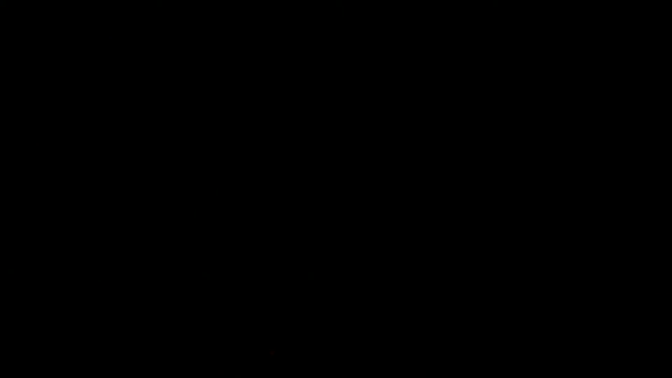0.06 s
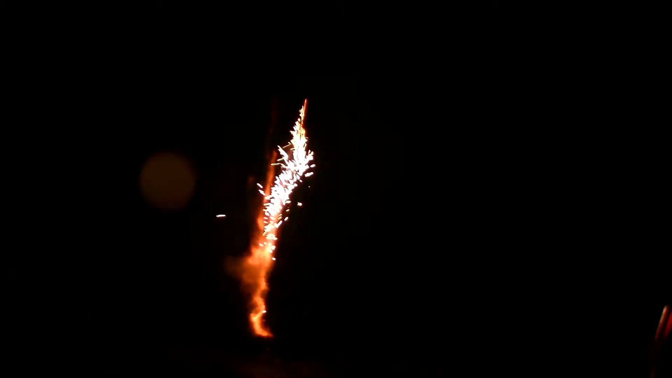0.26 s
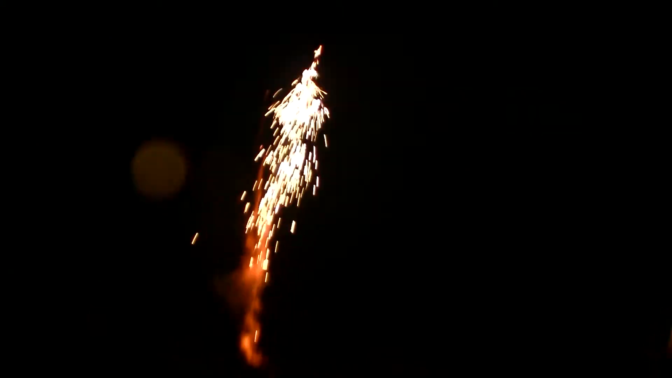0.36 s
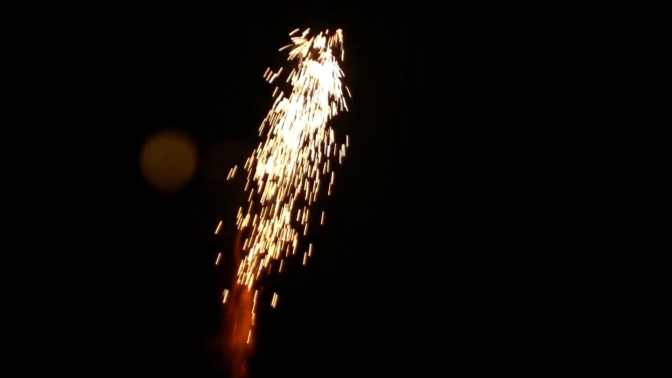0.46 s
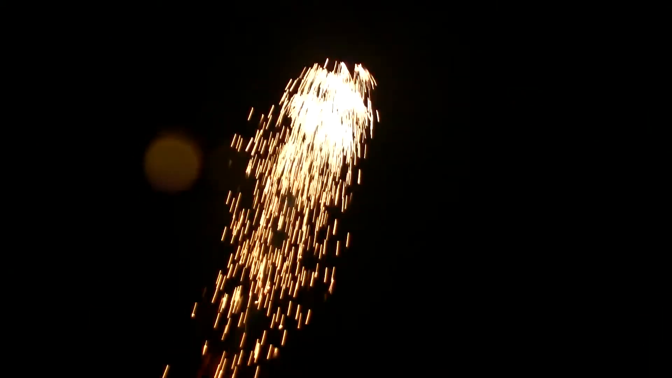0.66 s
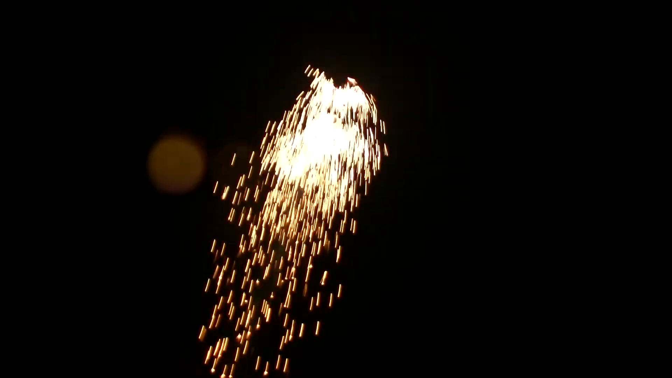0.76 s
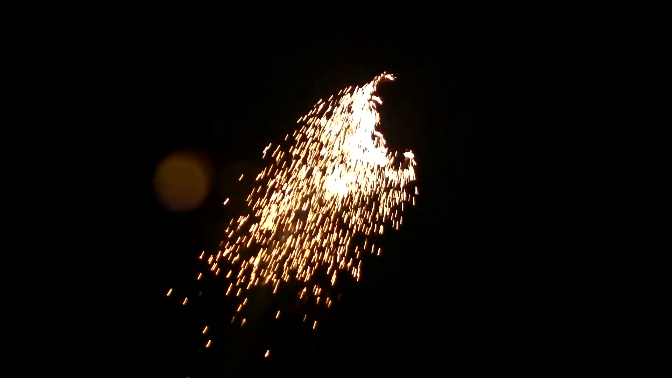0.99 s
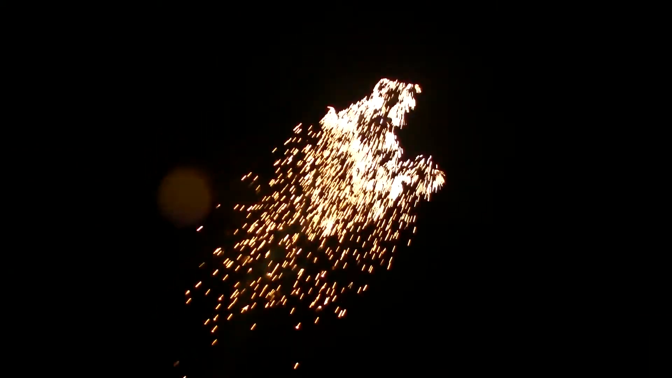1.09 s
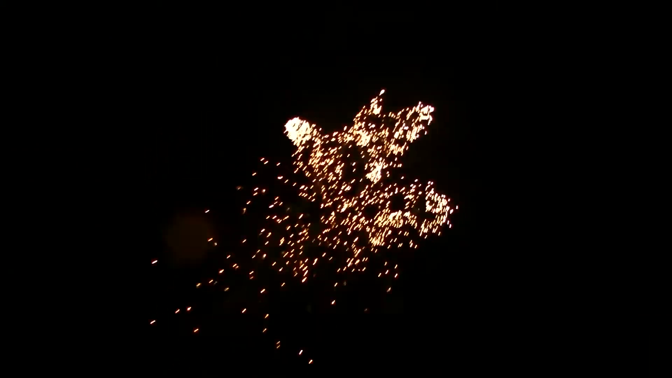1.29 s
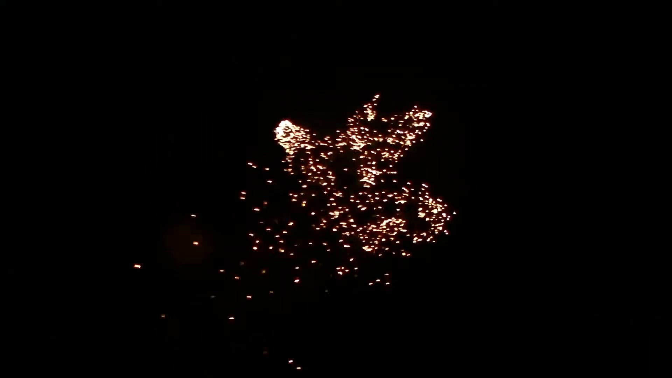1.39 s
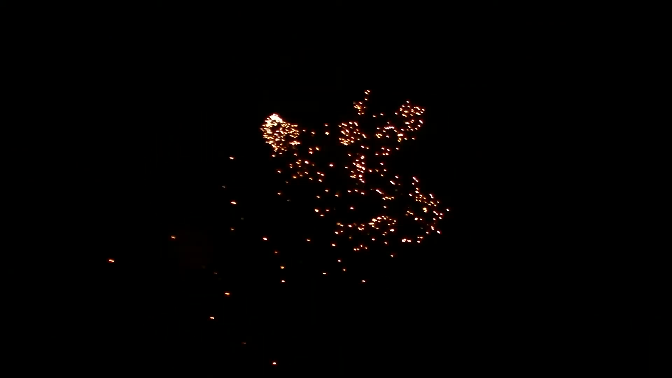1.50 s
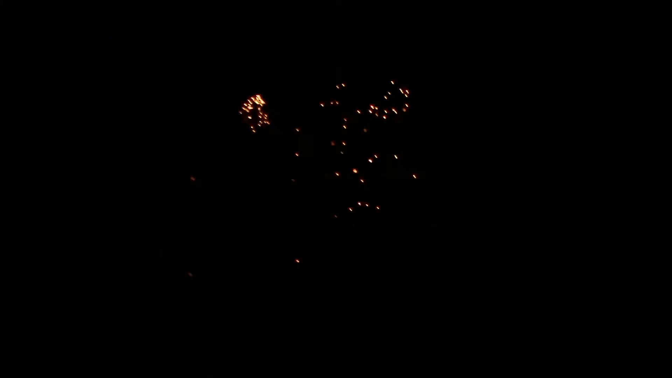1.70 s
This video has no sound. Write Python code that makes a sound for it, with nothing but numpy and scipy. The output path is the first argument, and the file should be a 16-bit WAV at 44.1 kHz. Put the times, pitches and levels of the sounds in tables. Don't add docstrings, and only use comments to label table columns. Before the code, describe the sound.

A whistling firework pops from its tube and screams raspily, falling in pitch, outdoors at night

```python
import sys
import numpy as np
from scipy import signal
from scipy.fft import rfft, irfft, next_fast_len
from scipy.io import wavfile
from scipy.ndimage import uniform_filter1d, map_coordinates

SR = 44100
rng = np.random.default_rng(int(sys.argv[2]) if len(sys.argv) > 2 else 0)


def file_out(sig):
    cols = np.atleast_2d(sig).T
    lim = np.clip(cols, -1, 1)
    pcm = np.round(lim * 32767).astype(np.int16)
    wavfile.write(sys.argv[1], SR, pcm)


def attenuation_scalar(level_db):
    decades = np.asarray(level_db, float) / 20
    return 10 ** decades


N = 74970

# [f/Hz, level/dB]
NIGHT_SPECTRUM = [(15, -40), (25, -15.5), (246, -6.5), (378, -8), (445, -8), (804, -16), (945, -15.5),
                  (1240, -15.5), (15500, -39)]
# [f/Hz, t60/s]
FIELD_DECAY = [(100, 0.23), (1000, 1), (3000, 1), (10000, 0.4)]
# [f/Hz, level/dB, t60/s]
TUBE_MODES = [(96, -15, 0.11), (262, -1, 0.042), (423, -7, 0.057), (998, -11, 0.022), (1186, -15.5, 0.048)]
# [t/s, level/dB, t60/s]
FLAME_PUFFS = [
    (.195, -29, 0.14),
    (0.2048, -5, 0.059),
    (.2125, -15, 0.047),
]
# [f/Hz, level/dB]
FLAME_SPECTRUM = [(100, 6), (400, -1.5), (1500, -7), (4000, -7.5), (8000, -16.5), (15000, -42)]
# [t/s, pitch f/Hz, tone level/dB, sputter level/dB, alternation/0-1, chaos/0-1]
STAR_FLIGHT = [(.246, 3896, -35, -60, 0, 0.45), (.262, 3815, -18, -35, 0, 0.4),
               (.272, 3655, -18, -14.5, 0, 0.67), (.31, 3443, -20.5, -20, 0.1, 1.06),
               (.345, 3395, -16, -18, 0, 0.84), (.41, 3251, -22.5, -13.5, 0.3, 0.88),
               (.5, 2960, -33, -16, 0, 0.86), (.56, 2830, -19.5, -17, 0, 0.98),
               (.66, 2747, -29.5, -17.5, 0, 0.91), (.8, 2626, -20, -14.5, 0.07, 0.88),
               (.92, 2400, -27, -14.5, 0.11, 0.91), (1.05, 2258, -19, -16, 0.3, 0.79),
               (1.15, 2191, -24.5, -19, 0.42, 0.68), (1.25, 2194, -24, -22.5, 0.37, 0.61),
               (1.33, 2250, -21, -21, 0.33, 0.55), (1.385, 2422, -30.5, -28.5, 0.43, 0.72),
               (1.435, 2702, -34, -33.5, 0.4, 0.65), (1.455, 2820, -73, -48, 0.06, .6)]
# [t/s, gain level/dB, half width/s]
STAR_FLARES = [(.285, 2, .015), (.39, 2.5, 0.025), (0.537, 4.5, 0.012), (0.646, 5.5, 0.0091),
               (.72, 2, 0.013), (.84, 0.5, 0.014), (.9, 1, 0.016), (.99, 1, 0.013), (1.12, 0, .012),
               (1.214, 5.5, 0.0092), (1.305, 0, .012)]
# [t/s, pitch f/Hz, tone level/dB, sputter level/dB, alternation/0-1, chaos/0-1]
FRAGMENT_FLIGHT = [
    (.88, 2151, -27, -31, 0.19, 0.72),
    (.98, 1996, -29, -26.5, 0.1, 0.74),
    (1.21, 2063, -16.5, -28, 0.8, 0.54),
    (1.33, 2008, -31, -26.5, 0.27, 0.54),
    (1.41, 1927, -36.5, -32.5, 0.62, 0),
    (1.49, 1989, -32, -33.5, .6, 0.08),
    (1.58, 2235, -39.5, -35, 0.17, 0.01),
    (1.635, 2405, -33.5, -45.5, 0.14, 0.13),
    (1.675, 2780, -46, -53, 0, 0.14),
]
# [f/Hz, level/dB]
PULSE_SPECTRUM = [(60, -51.5), (200, -10), (500, -3), (1500, -4), (3000, 0.5), (6000, -6), (10000, -22),
                  (15000, -38.5)]
# [f/Hz, level/dB]
DISTANCE_LOSS = [(2500, 2), (6000, -6), (15000, -20)]


def unit(x):
    return x / np.sqrt(np.mean(x ** 2) + 1e-20)


def along(points, hz):
    f, value = np.transpose(points)
    return np.interp(np.log(hz + 1), np.log(f + 1), value)


def wobble(rate):
    return map_coordinates(rng.standard_normal(1000), [np.arange(N) * rate / SR])


def coloured(x, spectrum):
    size = next_fast_len(N + SR // 4)
    gain = attenuation_scalar(along(spectrum, np.fft.rfftfreq(size, 1 / SR)))
    cepstrum = irfft(np.log(gain), size)
    cepstrum[1:size // 2] *= 2
    cepstrum[size // 2 + 1:] = 0
    response = np.exp(rfft(cepstrum))
    return irfft(rfft(x, size) * response, size)[:N]


def impulses(at, size):
    k = np.floor(at)[:, None] + np.arange(-7, 9)
    offset = k - at[:, None]
    shape = np.sinc(offset) * np.cos(np.pi * offset / 16) ** 2
    place = np.clip(k, 0, N - 1).astype(int)
    return np.bincount(place.ravel(), (shape * size[:, None]).ravel(), N)


def earlier_echoes():
    t = np.arange(N) / SR
    wash_db = -39.5 - 11 * t + 1.4 * wobble(33)
    wash = unit(coloured(rng.standard_normal(N), NIGHT_SPECTRUM)) * attenuation_scalar(wash_db)
    boom = attenuation_scalar(-34.5 - 60 * t / 0.23) * np.sin(2 * np.pi * 97 * t)
    return wash + boom


def field_echoes(x):
    delay_s = .025
    hz, t, z = signal.stft(rng.standard_normal(SR), SR, nperseg=256)
    decay = attenuation_scalar(-60 * t / along(FIELD_DECAY, hz)[:, None])
    tail = signal.istft(z * decay, SR, nperseg=256)[1]
    late = np.pad(x, (int(delay_s * SR), 0))
    return signal.fftconvolve(late, tail / np.linalg.norm(tail))[:N]


def muzzle_flame():
    t = np.arange(N) / SR
    level = 0
    for start, db, t60 in FLAME_PUFFS:
        level = level + (t > start) * attenuation_scalar(db - 60 * np.maximum(t - start, 0) / t60)
    return level * unit(coloured(rng.standard_normal(N), FLAME_SPECTRUM))


def lift_charge():
    pop_s, blast_s, crack_t60 = .2102, 0.00067, 0.0069
    t = np.arange(N) / SR
    u = np.maximum(t - pop_s, 0)
    kick = -attenuation_scalar(-6) * (1 - u / blast_s) * np.exp(-u / blast_s)
    ring = sum(attenuation_scalar(db - 60 * u / t60) * np.sin(2 * np.pi * hz * u) for hz, db, t60 in TUBE_MODES)
    crack = attenuation_scalar(-3.5 - 60 * u / crack_t60) * rng.standard_normal(N)
    return (t > pop_s) * (kick + ring + crack)


def whistler(flight, tone_swing_db, sputter_swing_db):
    waver, flutter_swing_db, jitter, scatter_db = .045, 2.5, 0.44, 4
    leave_s, far_s = 0.39, 1.42
    t = np.arange(N) / SR
    s, *columns = np.transpose(flight)
    hz, tone_db, sputter_db, alternation, chaos = [np.interp(t, s, c) for c in columns]
    alternation, chaos = np.clip(alternation, 0, 1), np.clip(chaos, 0, 1)
    burning = (t > s[0]) & (t < s[-1])

    cycles = np.cumsum(hz * (1 + waver * chaos * wobble(120))) / SR
    flutter_db = flutter_swing_db * chaos * wobble(140)
    tone = np.sqrt(2) * np.cos(2 * np.pi * cycles) * attenuation_scalar(tone_db + tone_swing_db + flutter_db)

    k = np.arange(1, int(cycles[-1]))
    luck = rng.standard_normal((N // 8, 2))[:len(k)]
    at = np.interp(k, cycles, np.arange(N))
    i = at.astype(int)
    strong_weak = 1 + alternation[i] * (-1.) ** k
    size = attenuation_scalar(scatter_db * chaos[i] * luck[:, 0]) * strong_weak
    shift = jitter * chaos[i] * luck[:, 1] * SR / hz[i]
    near = coloured(impulses(at + shift, size), PULSE_SPECTRUM)
    far = coloured(near, DISTANCE_LOSS)
    share = np.clip((t - leave_s) / (far_s - leave_s), 0, 1)
    sputter = (1 - share) * near + share * far
    sputter = sputter / np.sqrt(np.abs(uniform_filter1d(sputter ** 2, SR // 20)) + 1e-12)
    sputter = sputter * attenuation_scalar(sputter_db + sputter_swing_db + .5 * flutter_db)
    return burning * (tone + sputter)


def spinning_fragment():
    spin_hz, facing_s = 20.36, 1.47
    t = np.arange(N) / SR
    spin = np.cos(2 * np.pi * spin_hz * (t - facing_s))
    return whistler(FRAGMENT_FLIGHT, 1.5 * spin, 4 * spin)


def screaming_star():
    t = np.arange(N) / SR
    flare_db = sum(db * np.exp(-.5 * ((t - s) / width) ** 2) for s, db, width in STAR_FLARES)
    return whistler(STAR_FLIGHT, .5 * flare_db, flare_db)


def scene():
    shot = muzzle_flame() + lift_charge() + spinning_fragment() + screaming_star()
    mix = earlier_echoes() + attenuation_scalar(-20) * field_echoes(shot) + shot
    return mix[None]


def top_cut(x):
    return signal.sosfilt(signal.butter(12, 16130, fs=SR, output="sos"), x)


def record(dry):
    top, knee = 1.0, 7
    clipped = dry / (1 + np.abs(dry / top) ** knee) ** (1 / knee)
    return top_cut(clipped)


dry = scene()
out = record(dry)
file_out(out)
```